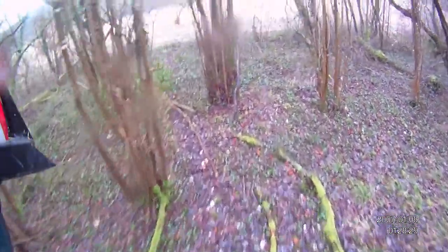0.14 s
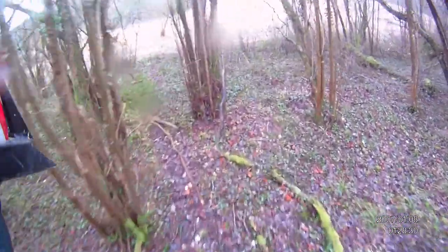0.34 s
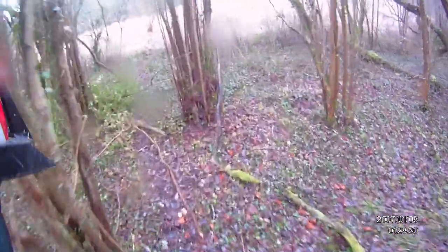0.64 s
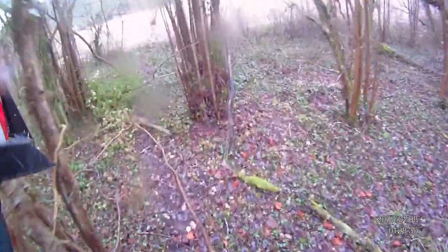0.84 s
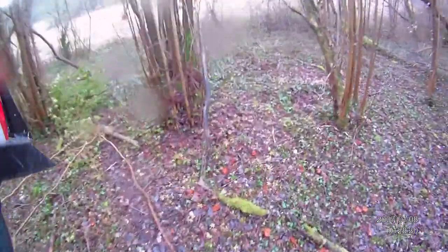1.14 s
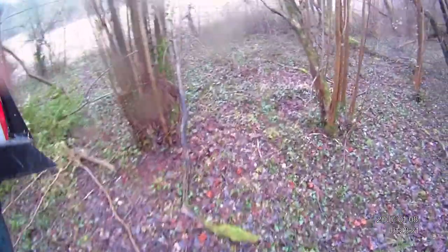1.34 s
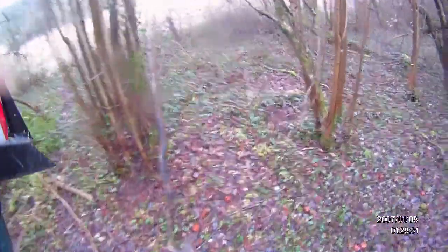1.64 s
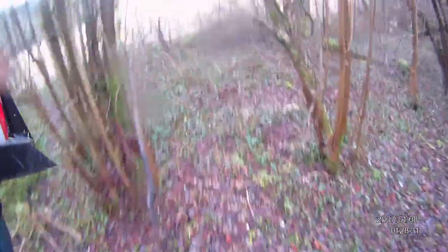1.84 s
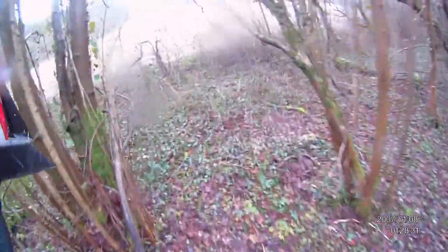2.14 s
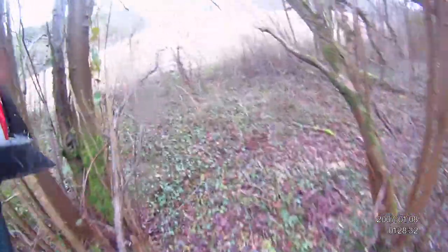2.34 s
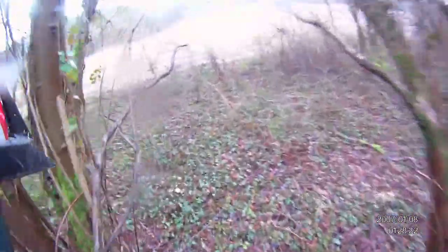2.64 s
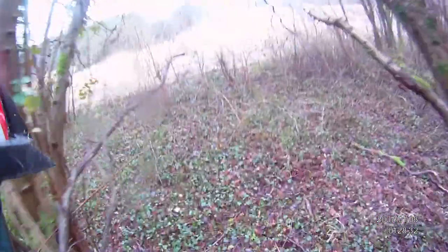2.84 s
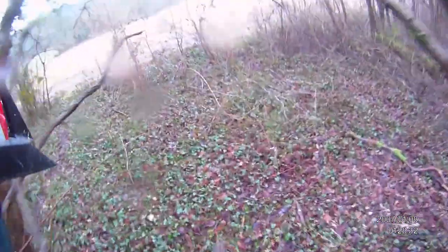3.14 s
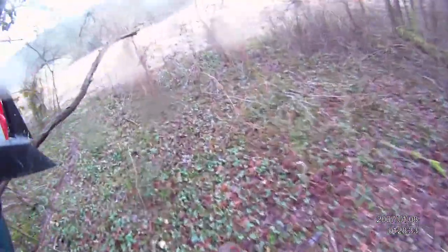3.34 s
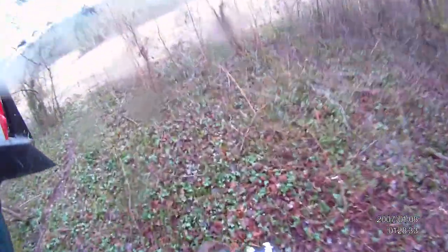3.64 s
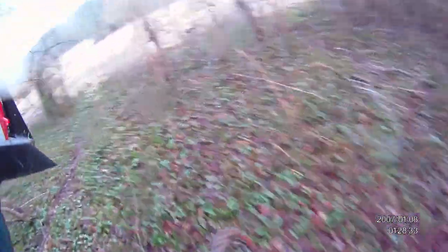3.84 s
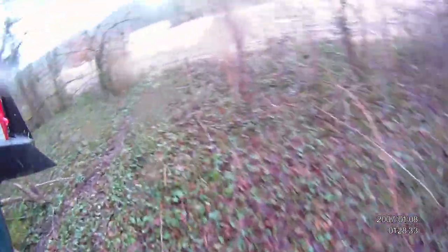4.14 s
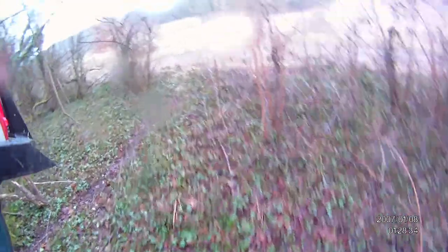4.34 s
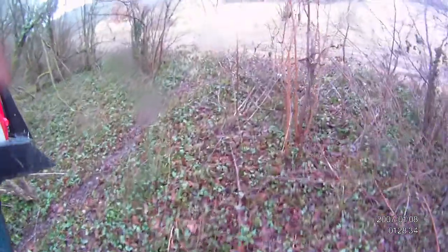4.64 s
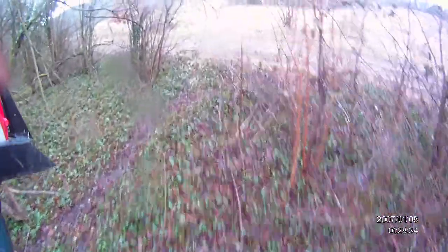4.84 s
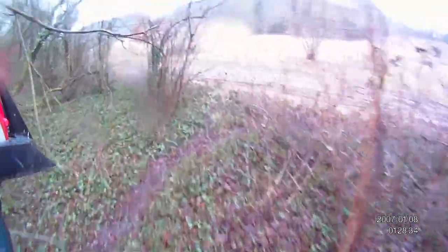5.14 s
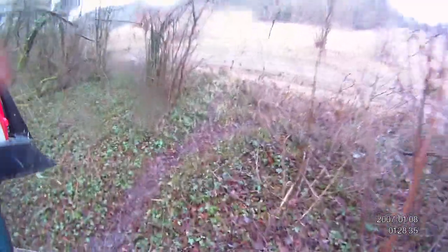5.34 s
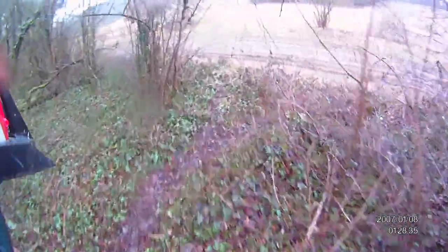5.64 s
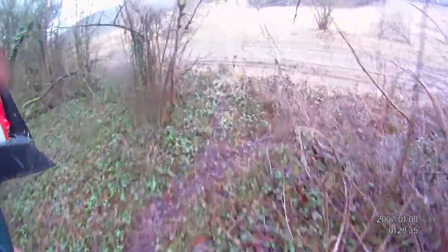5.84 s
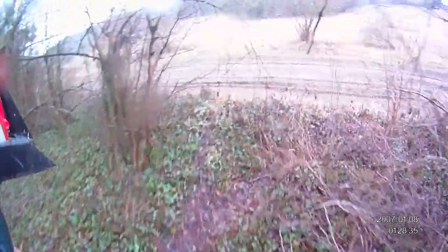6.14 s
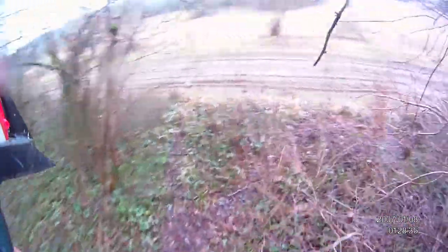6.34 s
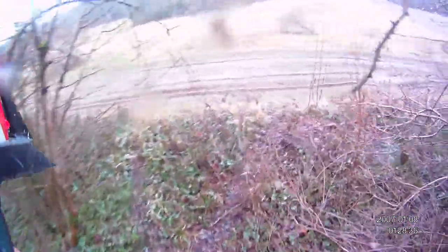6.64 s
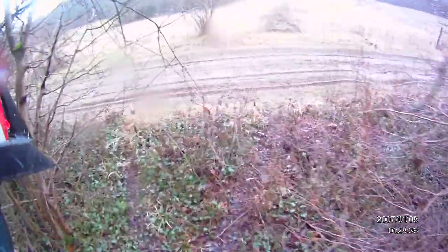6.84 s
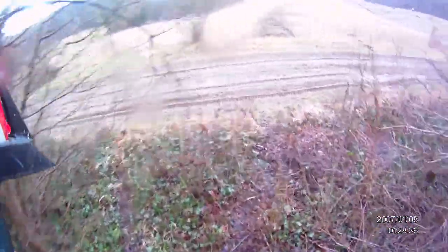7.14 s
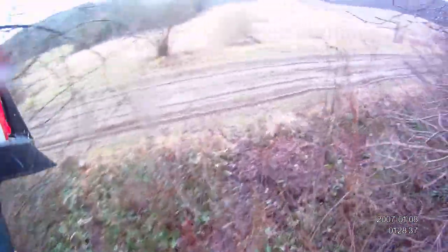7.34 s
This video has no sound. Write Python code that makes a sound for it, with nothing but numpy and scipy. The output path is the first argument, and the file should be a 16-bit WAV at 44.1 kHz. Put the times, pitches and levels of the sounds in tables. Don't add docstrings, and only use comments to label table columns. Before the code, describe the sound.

A bicycle rolls slowly over dry woodland litter, leaves rustling and crackling while twigs snap sharply and a branch whips the rider's helmet.

```python
import sys
import numpy as np
from scipy import signal
from scipy.fft import rfft, irfft
from scipy.io import wavfile
from scipy.ndimage import uniform_filter1d

SR = 44100
rng = np.random.default_rng(int(sys.argv[2]) if len(sys.argv) > 2 else 0)


def how_loud(loudness_db):
    steps = np.asarray(loudness_db, float) / 20
    return 10 ** steps


def store_pcm(level_fs):
    pcm = np.round(np.clip(level_fs, -1, 1) * 32767).astype(np.int16)
    wavfile.write(sys.argv[1], SR, np.atleast_2d(pcm).T)


N = 330750

# f/Hz, level/dB
CASE = [(100, -28.5), (430, -21), (1120, -2), (1310, 3.5), (1560, -4), (2500, 1), (3900, -1.5), (4800, 2),
        (5900, -0.5), (8000, -5), (10000, -15), (16000, -17)]


def rms_one(x):
    return x / np.sqrt(np.mean(x ** 2) + 1e-20)


def in_time(rows):
    s, *columns = np.transpose(rows)
    return [np.interp(np.arange(N) / SR, s, c) for c in columns]


def coloured(x, points):
    hz = np.maximum(np.fft.rfftfreq(N, 1 / SR), 1)
    point_hz, point_db = np.transpose(points)
    gain_db = np.interp(np.log(hz), np.log(point_hz), point_db)
    return irfft(rfft(x) * how_loud(gain_db), N)


def band(x, low_hz, high_hz, order=2):
    return signal.sosfilt(signal.butter(order, [low_hz, high_hz], "band", fs=SR, output="sos"), x)


def drift(rate_hz):
    r = np.exp(-80 * np.pi * rate_hz / SR)
    noise = rng.standard_normal(N // 40 + 2002)
    slow = signal.lfilter([1], [1, -2 * r, r * r], noise)[2000:]
    return np.interp(np.arange(N) / 40, np.arange(len(slow)), rms_one(slow))


def ring(clicks, hz, t60):
    r, w = how_loud(-60 / (t60 * SR)), 2 * np.pi * hz / SR
    return signal.lfilter([0, np.sin(w)], [1, -2 * r * np.cos(w), r * r], clicks + 1e-18)


def bursts(length_ms, tail_db, tail_ms):
    ms = np.arange(3000) / SR * 1000
    noise = rng.standard_normal((len(length_ms), 2, 3000))
    fibres = noise[:, 0] * np.abs(noise[:, 0])
    tearing = fibres * how_loud(-30 * ms / np.maximum(length_ms, 1)[:, None])
    tearing[:, 0] += 8.0
    lag = (10 + 40 * np.minimum(noise[:, 0, -1] ** 2, 2)).astype(int)[:, None]
    echo = np.take_along_axis(tearing, (np.arange(3000) - lag) % 3000, axis=1)
    tail = noise[:, 1] * how_loud(tail_db - 30 * ms / tail_ms)
    return tearing + 0.42 * echo + tail


def placed(rows, s, peak_db):
    rows = rows / np.abs(rows).max(axis=1, keepdims=True) * how_loud(peak_db)[:, None]
    out = np.zeros(N + rows.shape[1])
    starts = np.round(s * SR).astype(int)[:, None]
    np.add.at(out, starts + np.arange(rows.shape[1]), rows)
    return out[:N]


def struck(contacts, modes, spread_db):
    out = np.zeros(N)
    for hz, level_db, t60 in modes:
        clicks = np.zeros(N)
        for s, db, *favoured_hz in contacts:
            share = 1
            if favoured_hz:
                share = 1 / (1 + (np.log(hz / favoured_hz[0]) / 0.16) ** 2)
            strength = share * how_loud(db + level_db + spread_db * rng.standard_normal())
            clicks[round(s * SR)] = strength * rng.choice([-1, 1])
        out += ring(clicks, hz, t60)
    return out


def electronics():
    # f/Hz, level/dB rms
    whine_lines = [(7837, -70), (7897, -84)]
    # f/Hz, level/dB per Hz
    rumble_colour = [(25, -3), (57, 4), (130, -6.5), (400, 1), (800, -8)]
    t = np.arange(N) / SR
    whine = np.zeros(N)
    for hz, db in whine_lines:
        whine += np.sqrt(2) * how_loud(db + drift(4.2)) * np.sin(2 * np.pi * hz * t)
    low_noise = band(coloured(rng.standard_normal(N), rumble_colour), 22, 740)
    rumble = how_loud(-76 + 1.1 * drift(2.7)) * rms_one(low_noise)
    hiss = how_loud(-61.5) * band(rng.standard_normal(N), 430, 19000)
    return hiss + rumble + whine


def frame():
    # t/s, level/dB, favoured
    # f/Hz
    thumps = [
        (.5, -63, 95),
        (1.657, -47, 80),
        (1.702, -43.5, 75),
        (1.705, -57.5, 188),
        (2.49, -70, 188),
        (3.5, -67, 95),
        (4.9, -56, 116),
        (5.024, -51, 110),
        (5.158, -53, 171),
        (5.92, -69, 95),
              (.675, -73, 90), (1.673, -60, 90), (1.74, -56, 60), (3.122, -62, 120), (3.79, -60, 80),
             (3.96, -67, 120), (4.13, -69, 95), (4.24, -63, 70), (5.035, -67, 60), (5.3, -71, 57),
             (5.46, -73, 90), (6.045, -72, 95), (6.185, -74, 80), (7.0, -72, 169)]
    # f/Hz, level/dB, t60/s
    frame_modes = [(57, 3, 0.42), (95, 3, 0.13), (188, 10.5, 0.11)]
    return band(struck(thumps, frame_modes, spread_db=0.5), 35, 320)


def branch_on_helmet():
    # t/s, level/dB, favoured f/Hz
    whips = [(4.9014, -10.5, 2400), (4.9022, -8.5, 1400), (4.9038, -8, 1340), (4.9076, -11.5, 2410),
             (4.9075, -10, 1320), (5.0215, -17, 1970), (5.0235, -21, 1510), (5.0251, -6, 1450),
             (5.028, -18, 1530), (5.030, -11.5, 1630), (5.158, -19, 1450), (5.160, -23, 1490)]
    # t/s, level/dB, favoured f/Hz
    presses = [
        (4.9025, -2, 535),
        (4.9032, 4, 690),
        (4.904, -8, 910),
        (5.023, -4, 535),
    ]
    # f/Hz, level/dB, t60/s
    shell_modes = [(1290, 0.5, 0.025), (1730, -32, 0.0082), (1450, 0, 0.015), (1745, -9, 0.022),
                   (1870, -4, 0.036), (2060, 4, 0.012), (2310, -6, 0.03), (2495, 2, 0.0098)]
    # f/Hz, level/dB, t60/s
    padding_modes = [(535, -30.5, 0.067), (700, -32, 0.056), (890, -31, 0.063), (1290, -29, 0.09)]
    shell = band(band(struck(whips, shell_modes, spread_db=1.5), 1160, 3000), 1150, 3700)
    any_pitch = [row[:2] for row in whips[:10]]
    padding = band(struck(any_pitch, padding_modes, spread_db=5.0), 680, 1800, order=3)
    pressed = band(struck(presses, padding_modes, spread_db=0.5), 490, 940)
    return how_loud(3.0) * shell + padding + pressed


def rustle(woody_db, leafy_db):
    shared = drift(51)
    out = np.zeros(N)
    for low_hz, high_hz, level_db in [(250, 854, woody_db - 4.0), (1160, 1945, woody_db),
                                      (2110, 4600, leafy_db - 8), (4740, 6580, leafy_db),
                                      (6640, 9700, leafy_db - 7.0)]:
        noise = band(coloured(rng.standard_normal(N), CASE), low_hz, high_hz)
        out += how_loud(level_db + 1.54 * shared + 2.0 * drift(26)) * rms_one(noise)
    return out


def crackle(crackle_db, per_s):
    sizes = how_loud(4.6 * np.minimum(rng.exponential(1, N), 2.4))
    born = rng.random(N) < per_s * how_loud(5 * drift(12)) / SR
    dealt = rng.integers(0, 5, N)
    noise = coloured(rng.standard_normal(N), CASE)
    kinds = [(940, 2500, 0.0086), (3300, 6000, 0.017), (4100, 21000, 0.0042),
             (2800, 8700, 0.0068), (4970, 21000, 0.01)]
    out = np.zeros(N)
    for k, (low_hz, high_hz, t60) in enumerate(kinds):
        clicks = sizes * born * (dealt == k)
        puffs = signal.lfilter([1], [1, -how_loud(-60 / (t60 * SR))], clicks + 1e-18)
        out += puffs * band(noise, low_hz, high_hz)
    return how_loud(crackle_db) * rms_one(out)


def leaf_litter():
    # t/s, depth as rustle level/dB, woodiness/dB, dryness/dB
    path = [(0.0, -54.5, 0.5, 1.5), (0.69, -52, 2, 6), (0.94, -56.5, 1.5, 6), (1.5, -51.5, 1, -19),
            (2.15, -55, -2.5, 3), (2.57, -54, 0.5, 9.5), (2.96, -49, -1.5, -5), (3.49, -54, 0, 0),
            (3.89, -47.5, -3, -6), (4.13, -44.5, -1.5, 4.5), (4.3, -49, -4, -9), (4.55, -49, 1, 11),
            (4.8, -46, -2.5, -4), (5.64, -47.5, -3, 7), (5.76, -49.5, -4, -3), (6.2, -49.5, -3, 5),
            (6.6, -53.5, -3, -2), (7.5, -51.5, -1.5, 1)]
    depth_db, woodiness_db, dryness_db = in_time(path)
    crackle_db = -61 + 0.34 * (depth_db - depth_db.mean()) + dryness_db
    rubbing = rustle(depth_db - 2.5 + woodiness_db, depth_db - 3.5)
    crumbling = crackle(depth_db - 5, per_s=900)
    return rubbing + crackle(crackle_db, per_s=260) + crumbling


def flecks():
    # t/s, peak level/dB, f/Hz
    small_bits = [(0.04, -39, 1500), (0.2027, -39, 1220), (0.217, -35.5, 1490), (0.2605, -38, 1410),
                  (0.2853, -43, 1500), (0.3048, -39, 1680), (1.3336, -39, 1520), (1.761, -35.5, 1370),
                  (2.1906, -47, 720), (2.274, -37, 1340), (2.282, -38, 1320), (2.46, -35, 1310),
                  (2.639, -51, 716), (2.697, -35.5, 1300), (2.7748, -33, 1340), (2.8062, -40, 1390),
                  (2.9872, -44, 666), (3.024, -35, 1280), (3.055, -38, 1590), (3.098, -40, 1240),
                  (3.213, -37.5, 1240), (3.3725, -52, 690), (3.3918, -38, 1310), (3.4335, -39, 696),
                  (3.6851, -35.5, 696), (3.79, -33, 1460), (3.823, -32.5, 1600), (3.857, -34, 1290),
                  (3.921, -37.5, 1660), (4.022, -31, 1230), (4.0507, -29, 1450), (4.0929, -45, 676),
                  (4.7347, -48.5, 654), (4.7351, -34.5, 1230), (4.976, -48, 1320), (5.0624, -39, 1350),
                  (5.103, -33.5, 1440), (5.1175, -36, 1380), (5.1564, -41.5, 583), (5.3293, -35, 1270),
                  (5.3829, -32.5, 1370), (5.415, -36.5, 1280), (5.5947, -49, 620), (5.596, -34, 1410),
                  (5.619, -32.5, 1630), (5.741, -39, 1200), (5.898, -37, 1300), (6.0195, -36, 1150),
                  (6.261, -36.5, 1200), (7.2167, -37.5, 1260),
                  (0.0927, -48, 3390), (0.8314, -46, 3370), (1.0942, -26.5, 3060), (1.168, -28, 3100),
             (1.1915, -42, 3000), (1.2932, -36.5, 3160), (1.415, -32, 3260), (1.5798, -45, 2870),
             (1.738, -39, 3400), (1.7876, -39, 3400), (2.3502, -42, 2910), (2.4073, -44, 3300),
             (2.4208, -41, 2820), (2.4818, -41, 3230), (2.734, -37, 3150), (3.0184, -41, 3370),
             (3.0277, -34, 2870), (3.2677, -34, 2800), (3.3785, -46, 2970), (3.7129, -44, 2580),
             (4.0213, -42, 3030), (4.2038, -30, 3280), (4.4332, -39, 2660), (4.757, -38, 3260),
             (4.8593, -33.5, 3280), (5.1082, -29, 3600), (5.4439, -36, 3230), (6.3796, -43, 3110),
             (6.642, -41, 3200), (6.85, -37.5, 3060), (7.1915, -32, 2800), (7.2165, -40, 3080),
             (7.3306, -43, 3150), (7.354, -38, 3200),
                  (0.0938, -37, 5820), (0.6651, -34, 5760), (0.6655, -38, 7650), (0.7941, -38, 5250),
              (0.97, -39, 5570), (1.1396, -39, 7660), (1.1912, -40, 5300), (1.2064, -38, 7590),
              (1.6589, -38, 5040), (1.856, -37, 5190), (1.8572, -37, 7430), (2.2521, -25.5, 4740),
              (2.5277, -42, 5720), (2.6977, -31, 6100), (2.7714, -31, 5430), (3.0275, -31, 5250),
              (3.0913, -36, 5580), (3.4767, -31, 7670), (3.542, -34, 5300), (3.8843, -31, 5510),
              (3.9875, -28.5, 5670), (4.0216, -27, 6160), (4.1345, -32, 5790), (4.1933, -20, 7150),
              (4.2545, -25, 7590), (4.2639, -32, 7560), (4.2744, -19.5, 7300), (4.313, -28, 5850),
              (4.32, -25, 5760), (4.3487, -34, 5170), (4.6308, -21, 7400), (4.7113, -28, 5750),
              (4.9084, -19.5, 5420), (4.9723, -32, 5420), (5.0612, -33, 7730), (5.0615, -32, 5020),
              (5.2363, -37, 5170), (5.428, -27, 4870), (5.591, -28, 4900), (5.62, -34, 5540),
              (5.64, -27.5, 5450), (5.9698, -33, 5220), (6.0874, -33, 5020), (6.2615, -31.5, 5270),
              (6.8845, -31, 7040), (7.1792, -38, 4950), (7.284, -38, 5390), (7.3849, -34, 5160),
                  (0.692, -11.5, 4500), (0.691, -9, 7800), (0.693, -52, 374), (1.098, -46.5, 550),
                 (1.881, -32, 12100), (2.1908, -52, 735), (2.8635, -35, 12000), (3.128, -39, 400),
                 (4.096, -49, 380), (4.193, -37, 12500), (4.25, -40, 394), (4.902, -58, 170),
                 (4.903, -62, 298), (5.025, -48, 311), (5.765, -54, 372), (6.02, -18.5, 4830),
                 (6.123, -34, 11900), (6.947, -44, 540)]
    s, peak_db, pitch_hz = np.transpose(small_bits)
    tear = bursts(2.9 + 3500.0 / pitch_hz, tail_db=-25.0, tail_ms=27.0)
    rings = np.array([ring(band(row, 0.61 * hz, 1.67 * hz), hz, 16.0 / hz) for row, hz in zip(tear, pitch_hz)])
    return placed(rings, s, peak_db)


def breaks():
    # t/s, peak level/dB, push level/dB, f/Hz, length/ms
    thick_stems = [(1.8803, -29, -15, 1160, 11), (0.6923, -23.5, -28, 1420, 12),
                   (0.862, -27, -20, 1080, 6.1), (1.1007, -32, -16, 1340, 35),
                   (1.6642, -31, -9.5, 1360, 18), (1.7003, -29, -8, 1380, 25), (2.7507, -22, -8, 1290, 30),
                   (2.8635, -28, -23, 1070, 11), (2.9872, -27, -25, 1220, 11), (3.053, -37.5, -6, 1710, 15),
                   (3.1293, -26, 0, 1240, 29), (3.4336, -34, -17, 1210, 16), (3.449, -30.5, -10, 1140, 24),
                   (3.6862, -26, -8, 1290, 26), (4.0442, -29, -5, 2150, 32), (4.0941, -26, -27, 1280, 22),
                   (4.239, -26, -7, 1340, 280), (4.273, -32, -4, 1270, 11), (4.3122, -28, -14, 1420, 39),
                   (5.1757, -26.5, -16, 1160, 6.9), (6.123, -24, -24, 920, 5.8),
                   (6.9418, -30.5, -32, 1220, 8), (7.0142, -36, -16, 1290, 27),
                   (7.1923, -33, -38, 2200, 11)]
    # t/s, peak level/dB, length/ms
    thin_stems = [(0.6714, -30.5, 4.3), (0.7276, -32.5, 20), (0.76, -31.5, 33), (1.14, -34.5, 10),
                  (1.3384, -35.5, 11), (1.387, -31.5, 6.4), (1.473, -35.5, 12), (0.038, -52, 9.7),
                  (1.991, -35, 6.5), (2.2517, -28, 3.8), (2.366, -34, 51), (2.584, -34, 14),
                  (3.0293, -34.5, 11), (3.117, -29.5, 11), (3.457, -27.5, 20), (3.5917, -30.5, 8.3),
                  (3.712, -31.5, 14), (3.87, -32, 3.1), (3.884, -30, 15), (3.987, -29, 8.3),
                  (4.204, -24, 3.7), (4.2544, -17.5, 3.4), (4.302, -29, 2.9), (4.439, -26, 20),
                  (4.606, -29.5, 18), (4.6315, -25.5, 13.4), (6.8112, -35, 14), (5.669, -23, 6),
                  (6.223, -33, 7), (7.387, -34, 15)]
    thin_pitch_hz = 1300
    thin_rows = [(s, db, -34, thin_pitch_hz, ms) for s, db, ms in thin_stems]
    s, peak_db, low_db, pitch_hz, length_ms = np.transpose(thick_stems + thin_rows)
    tear = bursts(1.45 * length_ms - 4.0, tail_db=-16, tail_ms=53)
    wood = []
    for row, hz in zip(tear, pitch_hz):
        cycles = 16.2 if hz == thin_pitch_hz else 9.1
        wood.append(ring(band(row, 0.76 * hz, 6.5 * hz), hz, cycles / hz))
    push_s = 0.0093
    push = band(tear * how_loud(-30 * np.arange(3000) / SR / push_s), 370, 1900, order=3)
    return placed(np.array(wood), s, peak_db) + placed(push, s, peak_db + low_db)


def cracks():
    # t/s, peak level/dB, middle level/dB, top level/dB, length/ms
    twigs = [(0.6919, -8.5, -14, -14, 8.7), (1.88, -9.5, -9, -2.5, 2.6), (2.5875, -16.5, -3, -5, 13),
             (2.7508, -7.5, -7.5, -27, 8.6), (2.8635, -12, -6.5, 0.5, 14), (2.9885, -16, -9, -1, 9),
             (3.1283, -16, -5, -16, 25), (3.5914, -19.5, -6, 1.5, 8.5), (3.6856, -22, 1.5, -21, 35),
             (4.0279, -18, -3, -18, 6.8), (4.045, -11.5, -21, 2.5, 2.4), (4.0494, -18.5, 4, -26, 14),
             (4.1928, -17.5, -0.5, -24, 9.6), (4.204, -14.5, -2, -4, 3.1), (4.2396, -13.5, -6, -35, 2.7),
             (4.272, -17.5, -14, -40, 17), (4.6303, -20.5, -1.5, -34, 11), (4.7354, -14, -9, -36, 3),
             (5.0214, -14, 3.5, -21, 15), (5.0403, -15, -4, -36, 5.8), (5.0986, -14, -6, 6.5, 8.5),
             (5.3823, -17, -3.5, -5, 9), (6.02, -24.5, -19, 0, 19), (6.1231, -18.5, -1, 2.5, 8.8)]
    # t/s, peak level/dB, middle level/dB, length/ms
    stalks = [(0.8628, -28.5, -1.5, 7.8), (1.095, -25.5, -3, 19), (1.1073, -40, 9, 17),
              (1.1244, -40, 12, 4.6), (1.14, -30, -1, 8), (1.161, -41.5, 15.5, 8.4), (1.174, -41, 10, 4.6),
              (1.427, -39, 12.5, 4.6), (1.473, -32, 0, 16), (2.189, -27.5, -0.5, 3.7),
              (2.2518, -28.5, 5.5, 4.9), (2.375, -30, 2.5, 33), (2.4916, -35.5, 5.5, 16),
              (2.7417, -21, -0.5, 8), (2.8068, -26.5, -1.5, 11), (2.883, -26.5, 3, 8.2),
              (3.0307, -26.5, -6, 22), (3.0548, -23, -0.5, 10), (3.456, -28.5, 1.5, 17),
              (3.468, -24, 3, 9.2), (4.0968, -30, 10.5, 13), (4.252, -24, -1, 53), (4.263, -25, 0, 105),
              (4.456, -29, 6, 5.1), (4.9014, -21.5, 7, 9.3), (5.33, -29, 5, 8), (5.41, -43.5, 21, 4.6),
              (5.669, -25.5, 6, 3), (7.1915, -49, 2, 4.7), (7.1986, -37, 3, 26)]
    # t/s, peak level/dB, length/ms
    leaves = [(0.0386, -24, 2.8), (0.41, -38, 7.4), (1.207, -28, 5.1), (1.386, -30.5, 24),
              (2.013, -34, 9.2), (2.2594, -33, 17), (2.342, -30, 11), (2.351, -28, 11), (2.537, -30.5, 7.9),
              (2.641, -27.5, 5.9), (3.0214, -26, 11), (3.2824, -32.5, 10), (3.392, -25, 3),
              (3.432, -30.5, 32), (3.476, -30, 9.3), (3.791, -22, 8.5), (3.8703, -22.5, 10),
              (3.921, -22.5, 7.7), (4.475, -26, 3.1), (4.5351, -26, 4), (4.551, -29, 5.6),
              (4.644, -27, 6.1), (4.74, -20, 3.7), (5.237, -49, 4), (5.99, -23.5, 3), (6.533, -35, 10),
              (6.885, -25, 3), (7.015, -34, 5.8), (7.354, -33, 11), (7.361, -31, 8.6)]
    # t/s, peak level/dB, top level/dB, length/ms
    tips = [(1.3331, -26, -1, 3.8), (1.414, -30, 9, 5.3), (1.9926, -31, -2, 6), (2.3368, -21, -21, 3.1),
            (2.364, -23, 1, 13), (2.4583, -31.5, 2, 13), (3.116, -22, -10, 11), (3.316, -26, -8, 5.7),
            (3.823, -27.5, 9, 6.8), (4.757, -24, 12, 5.7), (4.859, -29, 10.5, 7.3), (5.1771, -19.5, 1, 3),
            (5.197, -26, 6.5, 7.6), (5.556, -22.5, 6, 6.5), (6.223, -24, 2, 6.7), (6.832, -34, 4.5, 62),
            (3.8587, -32, 10, 3.4), (3.9769, -29, -6, 3.5), (4.6688, -27, 3.5, 8.8), (4.786, -26.5, 3, 3.4),
            (4.8863, -34, 9, 4), (5.5197, -31, -1, 150), (5.613, -25.5, -2, 2.5), (5.9, -31, -10, 21),
            (5.912, -29, -8, 3.4), (5.925, -30, -9, 6), (5.962, -44, 9, 5), (6.012, -30, 0, 5.9),
            (6.053, -28, 3, 4), (6.065, -29, 2, 5)]
    snaps = (twigs
             + [(s, db, middle_db, -43, ms) for s, db, middle_db, ms in stalks]
             + [(s, db, -8, -40, ms) for s, db, ms in leaves]
             + [(s, db, -4.5, top_db, ms) for s, db, top_db, ms in tips])
    s, peak_db, middle_db, top_db, length_ms = np.transpose(snaps)
    tear = bursts(1.14 * length_ms - 3.0, tail_db=-17.5, tail_ms=85.0)
    main = placed(band(tear, 4110, 6704, order=3), s, peak_db)
    middle = placed(band(tear, 1990, 4810), s, peak_db + middle_db)
    top = placed(band(tear, 7900, 9900), s, peak_db + top_db - 13.0)
    return main + middle + top


def scene():
    ride = electronics() + frame() + branch_on_helmet()
    ground = leaf_litter() + flecks() + breaks() + cracks()
    return (ride + ground)[None]


def band_limit(x):
    return signal.sosfilt(signal.butter(12, 16510, fs=SR, output="sos"), x)


def record(dry):
    rounded = .95 * np.tanh(dry / .95)
    x = signal.sosfilt(signal.cheby2(16, 70, 16550, fs=SR, output="sos"), rounded)
    low = signal.sosfiltfilt(signal.ellip(10, .3, 35, 15300, fs=SR, output="sos"), x)
    edge = x - low
    edge_rms = np.sqrt(uniform_filter1d(edge ** 2, size=256).clip(0))
    gate = uniform_filter1d((edge_rms > how_loud(-61)) * 1., size=256)
    return band_limit(low + edge * gate)


dry = scene()
out = record(dry)
store_pcm(out)
```